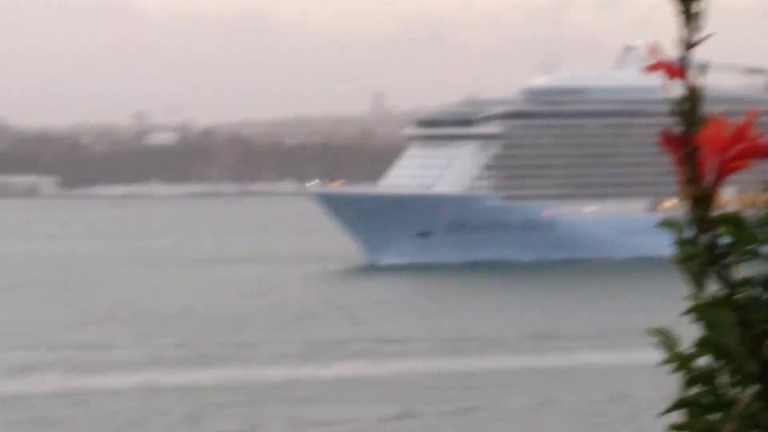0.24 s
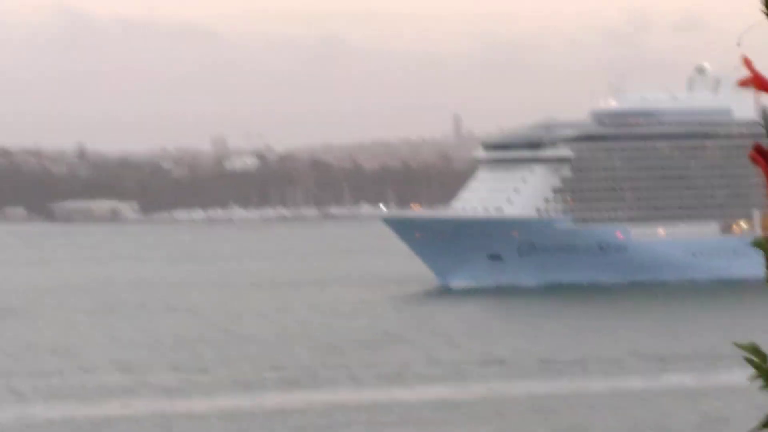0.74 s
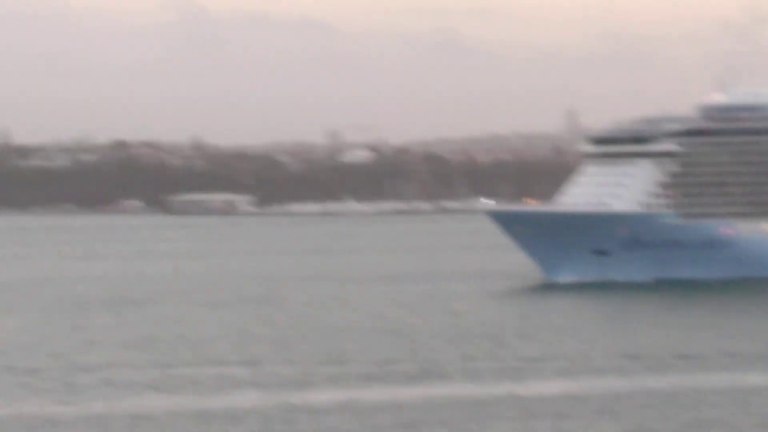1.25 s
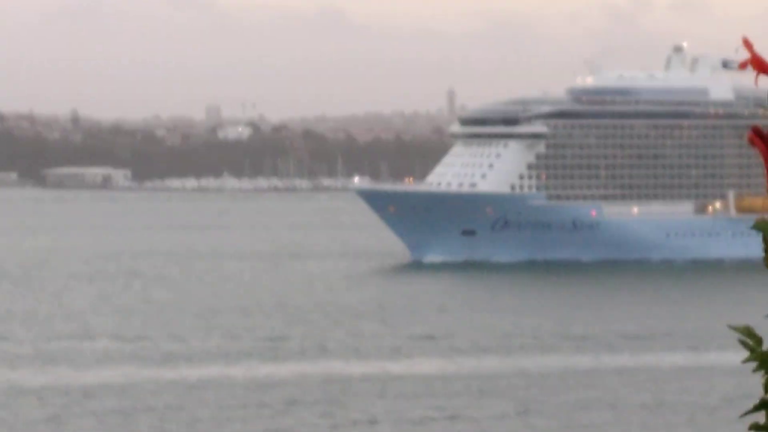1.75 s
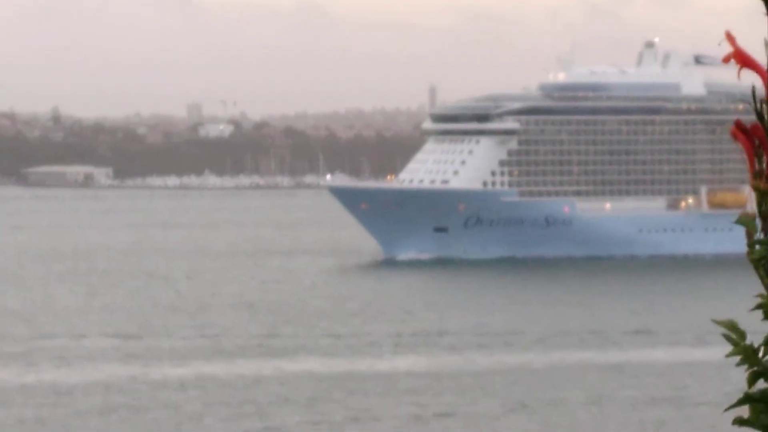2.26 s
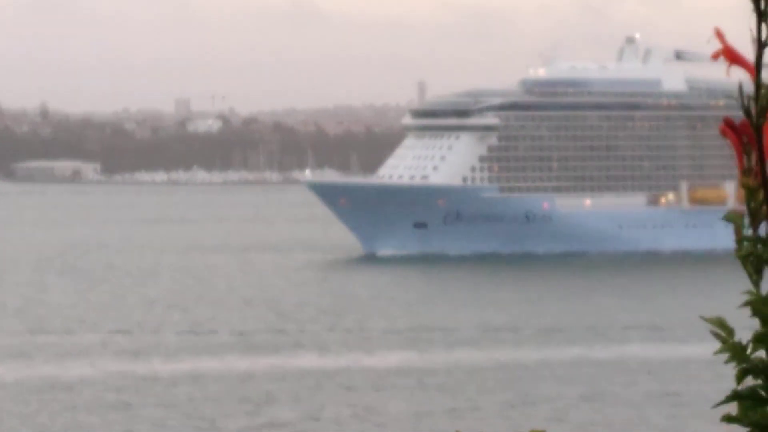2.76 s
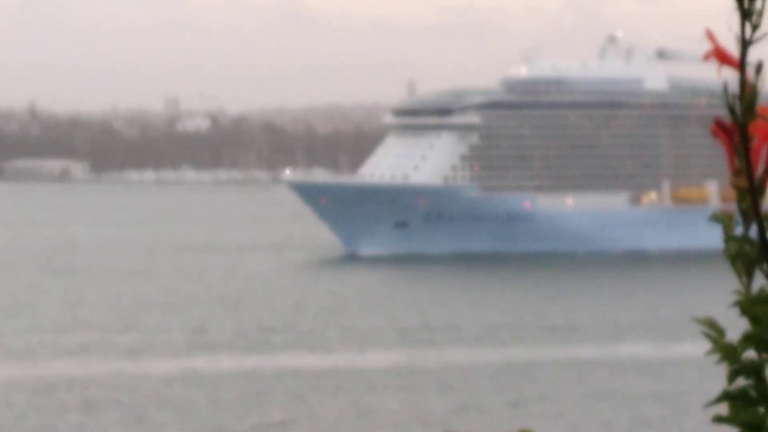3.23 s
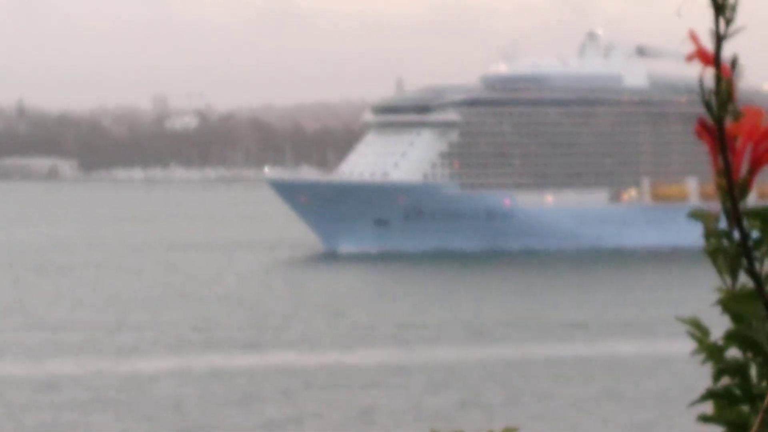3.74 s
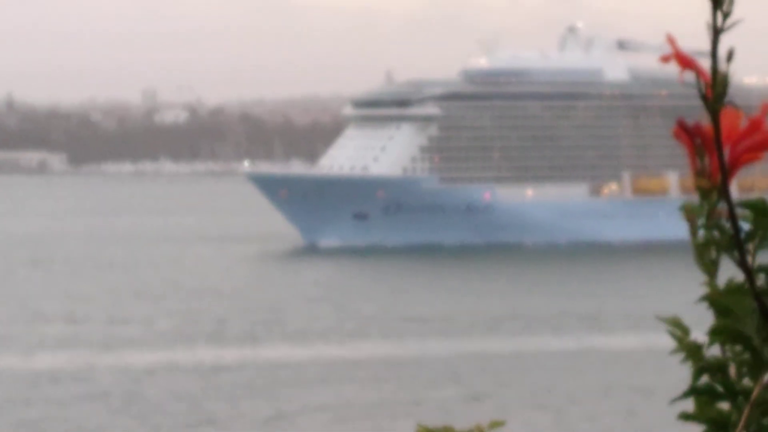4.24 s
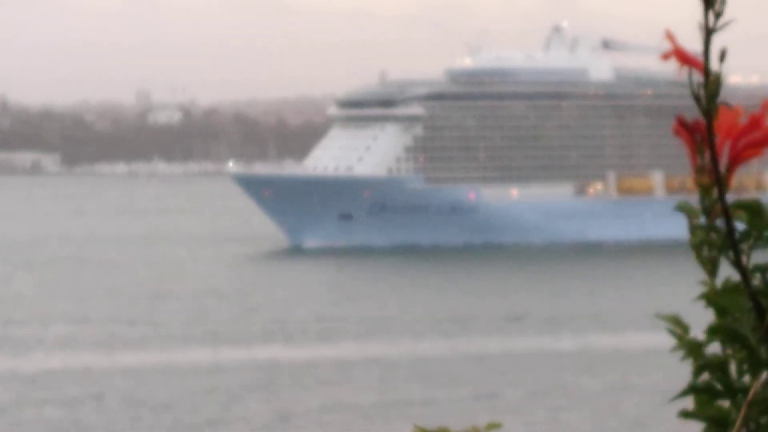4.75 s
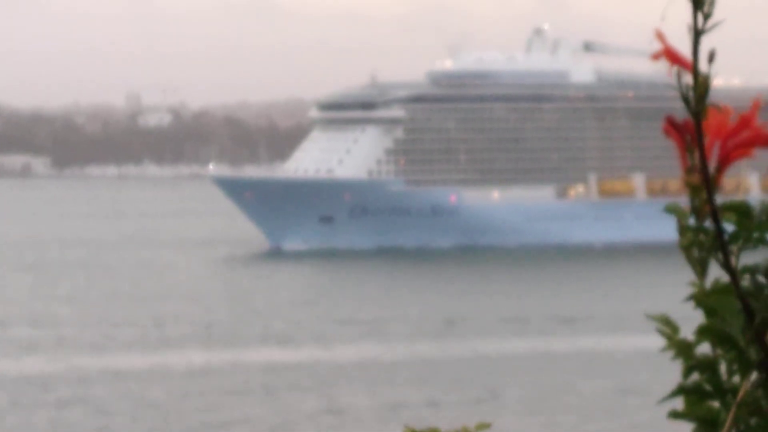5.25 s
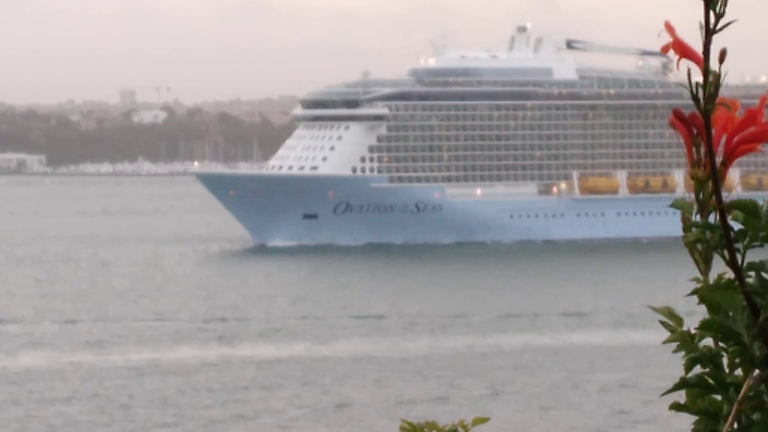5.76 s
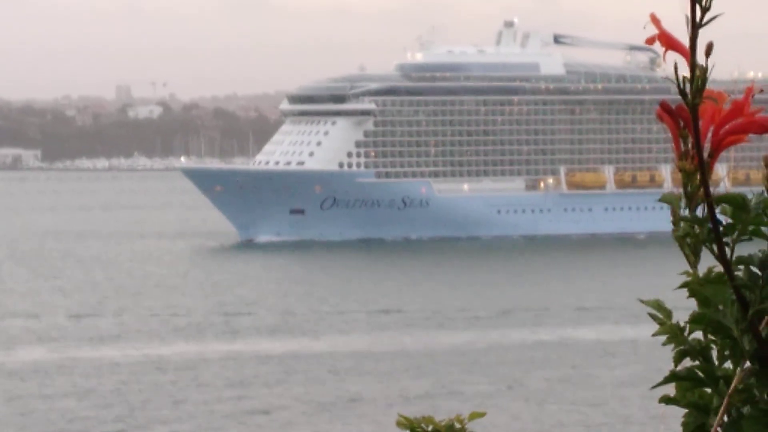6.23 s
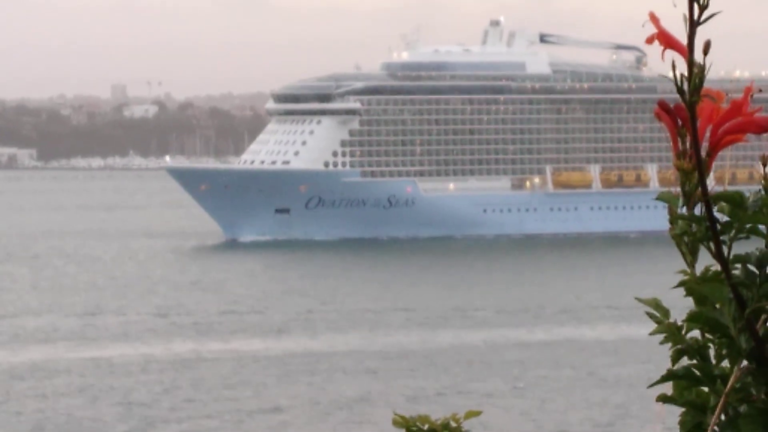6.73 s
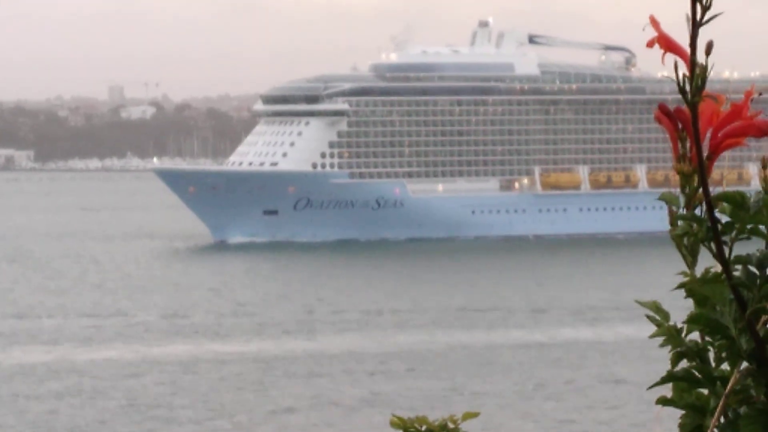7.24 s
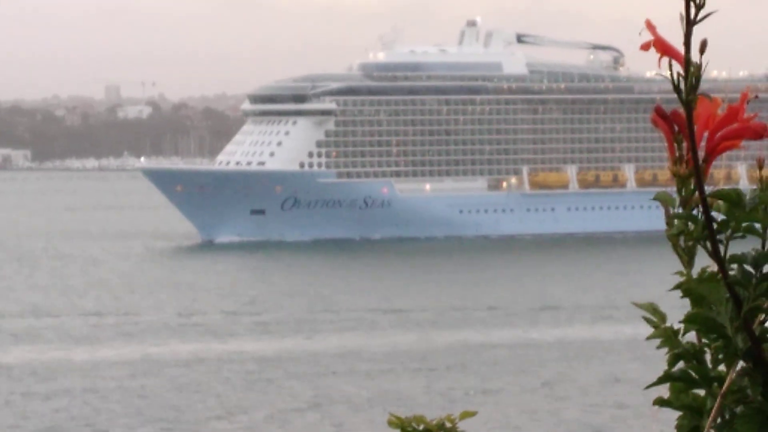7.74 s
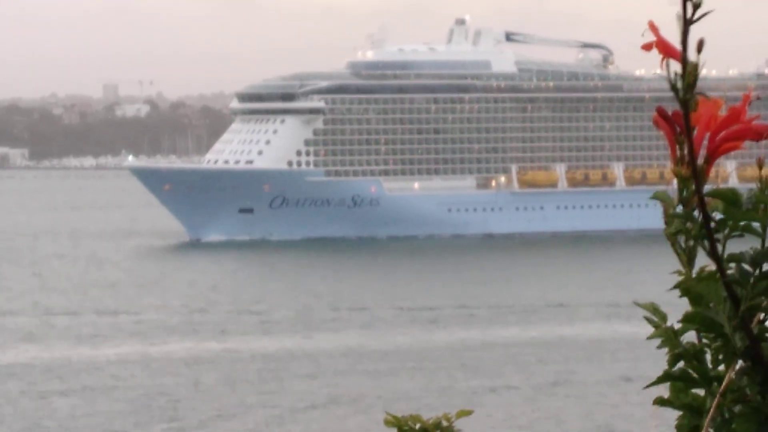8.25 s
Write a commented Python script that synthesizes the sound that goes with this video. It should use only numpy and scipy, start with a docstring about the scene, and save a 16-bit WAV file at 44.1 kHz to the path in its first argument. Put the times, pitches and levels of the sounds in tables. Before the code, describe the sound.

A large ship's low engine drone hums across open harbour water under buffeting wind, with faint high bird chirps and a small click near the end.

```python
"""Breezy harbour shore: wind thumps on two microphone ports (low noise), a far ship hums (sines) over its wash
(noise bands and brief tones). The treble is mostly muffled; now and then it opens slowly and shuts at once.
From 1.0 s thin chirps (gliding sines), 1.4 s a hoarse bird call (noise-modulated sines), then dry taps
(noise cracks); chirps thicken from 5.3 to 7.6 s; at 8.0 s a small hard thing clicks (decaying modes)."""
import sys
import numpy as np
from scipy import signal
from scipy.io import wavfile
from scipy.ndimage import uniform_filter1d

SR = 44100
rng = np.random.default_rng(int(sys.argv[2]) if len(sys.argv) > 2 else 0)


def field_ratio(decibels):
    """Amplitude ratio for a level in dB (20 dB per decade); scalars and array-likes work."""
    return 10 ** (np.asarray(decibels, dtype=float) / 20)


def file_out(sig):
    """Save sig as 16-bit WAV at sys.argv[1]."""
    # one column per channel
    cols = np.atleast_2d(sig).T
    # limit, then scale
    lim = np.clip(cols, -1, 1)
    pcm = np.round(lim * 32767).astype(np.int16)
    wavfile.write(sys.argv[1], SR, pcm)


N = 374409
TIME = np.arange(N) / SR

# Breeze between gusts: (time [s], left thump [dB], right thump [dB])
BREEZE = [(0, -29, -31.5), (0.7, -39.5, -40), (1.5, -43, -32), (2.4, -38, -33.5), (3.15, -40, -46),
          (3.8, -32, -31.5), (4.6, -39, -35), (5.3, -56, -41), (6.2, -49.5, -39.5), (6.8, -33.5, -37),
          (7.6, -40, -46), (8.49, -38, -33)]
# Gusts: (peak time [s], length [s], thump [dB], flutter before makeup gain [dB], left minus right [dB])
GUSTS = [(0.027, 0.071, -30.5, -65, -10), (1.181, 0.1, -24.5, -54, -9), (1.318, 0.14, -21, -39, -10.5),
         (1.828, 0.46, -27.5, -58.5, -21), (1.968, 0.1, -37.5, -52, 9), (2.185, 0.14, -31.5, -59.5, -10.5),
         (2.521, 0.23, -38, -58, 6.5), (2.735, 0.13, -26.5, -45, 5.5), (3.453, 0.11, -26.5, -39, -21.5),
         (3.583, .25, -28, -53, -7), (3.999, 0.17, -29, -48, -0.5), (4.334, 0.12, -37, -39.5, -13),
         (4.683, 0.4, -31.5, -48.5, -11), (6.38, 0.27, -49, -53, -11), (6.578, 0.16, -29.5, -61, 9),
         (6.849, 0.15, -33, -60, 8), (7.158, 0.14, -36, -54, -14.5), (7.363, 0.098, -30.5, -46, 5),
         (7.655, 0.31, -29.5, -58, 12), (7.945, 0.2, -40, -67, 8), (8.228, 0.24, -32, -58, 0.5),
         (8.42, .2, -33.5, -54, 10.5)]
# Bird whistles: (start [s], length [s], first pitch [Hz], last pitch [Hz], peak level before pan [dB])
CHIRPS = [(0.985, 0.019, 8450, 8450, -89), (1.958, .02, 8600, 8550, -85), (2.035, .032, 7900, 7560, -87.5),
          (2.91, .05, 8600, 8700, -93), (3.926, .025, 8300, 8640, -89), (3.97, 0.052, 8600, 8840, -91),
          (4.02, .12, 8700, 8650, -98), (5.275, 0.064, 7300, 7550, -80.5), (5.8, .024, 7100, 7420, -80),
          (5.845, .03, 8000, 7450, -83), (5.966, .04, 7800, 8100, -77), (6.0, .04, 8050, 7780, -73),
          (6.007, .03, 7450, 7400, -64), (6.04, 0.099, 7050, 7540, -67.5), (6.13, .04, 7200, 7800, -77),
          (6.29, .11, 7000, 7430, -67), (6.862, 0.073, 7100, 7620, -68.5), (6.886, 0.044, 3720, 3560, -73),
          (6.954, 0.039, 3360, 3584, -70), (7.099, 0.085, 7200, 7500, -66.5),
          (7.312, 0.063, 6660, 6800, -78.5), (7.546, .06, 6100, 5860, -88)]
# Hoarse bird call: (time [s], centre [Hz], level before makeup gain [dB])
RASP = [(1.37, 4150, -84), (1.4, 4400, -69), (1.45, 4490, -69.5), (1.542, 4400, -75.5), (1.55, 4590, -69.5),
        (1.63, 4420, -77), (1.635, 4530, -81)]
# Clicks of a small hard thing: (time [s], drive [dB])
CLICKS = [(8.0348, -30)]
# Its modes: (frequency [Hz], level re drive [dB], t60 [s], left minus right [dB])
CLICK_MODES = [(2960, -18, 0.041, -15), (3530, 1.5, 0.023, 5), (4300, 6, 0.018, 7), (4360, -3, 0.02, 3),
               (5240, -10, 0.03, 6), (5980, 2, .012, 5), (6340, 0.5, 0.035, 11), (6545, -25, .068, -2),
               (7040, -20, 0.069, 2), (7962, -20, .042, -8), (8963, -20, .051, -19), (9450, -8.5, .01, -19),
               (9800, -26, .08, -13)]
# Dry taps on the housing: (time [s], drive [dB], left minus right [dB], lowest frequency [Hz])
TAPS = [(1.613, -57, 12, 5000), (1.7385, -40.5, 1, 850), (2.746, -59, 14.5, 5500)]
# Clearest brief tones in the wash: (middle [s], frequency [Hz], peak rms level [dB], length [s])
MOANS = [(0.21, 860, -54, 0.16), (2.37, 390, -46, 0.15), (2.373, 681, -51.5, 0.17), (2.468, 337, -46, 0.15),
         (2.65, 521, -54, 0.13), (2.668, 314, -49, 0.37), (3.196, 710, -53, 0.21), (3.815, 670, -53, 0.25),
         (5.669, 697, -57.5, 0.31), (6.094, 745, -48.5, 0.11), (6.095, 327, -49, 0.18),
         (6.363, 945, -56, 0.25), (6.381, 864, -49.5, 0.14), (6.566, 445.4, -47, 0.15),
         (6.729, 364.7, -49, 0.18), (6.8, 325, -47, 0.15), (6.831, 573, -51.5, 0.16)]
# Treble openings: (from [s], to [s], share open [0-1])
OPENINGS = [(0.987, 1.007, 0.8), (1.217, 1.236, 0.67), (1.38, 1.633, 0.9), (1.725, 1.762, 0.9),
            (2.161, 2.207, 0.7), (2.243, 2.365, 0.84), (2.41, 2.46, 0.63), (2.467, 2.509, 0.73),
            (2.739, 2.766, 0.54), (3.04, 3.064, 0.9), (3.13, 3.16, 0.55), (3.406, 3.453, 0.85),
            (3.86, 3.9, 0.73), (4.245, 4.275, 0.66), (4.654, 4.671, .5), (5.3, 5.341, 0.8),
            (5.778, 5.822, 0.7), (5.838, 5.883, 0.77), (5.895, 6.521, 1.0), (6.561, 6.64, 0.7),
            (6.824, 6.856, 0.75), (6.875, 6.942, 0.77), (6.963, 7.004, 0.79), (7.13, 7.181, 0.9),
            (7.325, 7.409, 0.83), (7.561, 7.599, 0.7), (7.936, 8, 0.62), (8.04, 8.089, 0.87),
            (8.1, 8.237, 0.7), (8.241, 8.27, 0.75)]
# Swell of the far exhaust and water wash: (time [s], near 360 Hz [dB], near 820 Hz [dB], near 200 Hz [dB])
SWELL = [(0.0, -49, -51.5, -71), (0.09, -49, -52, -52), (0.8, -53, -54, -58.5), (1.16, -51.5, -57, -53.5),
         (2.22, -49.5, -53, -62), (2.41, -43.5, -50.5, -51), (2.84, -46, -54.5, -48.5),
         (3.19, -51.5, -52, -49), (3.59, -53, -55.5, -50.5), (3.83, -46, -49.5, -53.5),
         (4.09, -50, -54.5, -53.5), (5.37, -50.5, -52.5, -58.5), (6.48, -46.5, -50, -51.5),
         (6.53, -40.5, -56, -72), (6.74, -45, -52.5, -59), (6.81, -48.5, -54.5, -71.5),
         (6.88, -48.5, -52.5, -48.5), (7.59, -53, -57.5, -57.5), (8.16, -48.5, -49.5, -57.5),
         (8.49, -47, -58, -56)]
# Wash spectrum with treble open, before trim and swell: (frequency [Hz], level [dB])
WASH = [(20, -25.5), (60, -16.5), (90, -12.5), (130, -22), (220, -24.5), (290, -27.5), (400, -26),
        (560, -28.5), (750, -25.5), (1300, -36.5), (1800, -38.5), (2500, -46), (3500, -48), (5000, -57),
        (7500, -59.5), (10000, -68.5), (14000, -88.5)]
# Gain added while the treble is shut: (frequency [Hz], gain [dB])
MUFFLE = [(500, 0.5), (1000, -4), (2600, -13.5), (3200, -22.5), (5000, -19.5), (8000, -25), (11000, -12.5)]
# Left-right correlation of the wash noise: (frequency [Hz], likeness [0-1])
LIKENESS = [(60, 1), (140, 1), (320, 0.98), (750, 0.79), (1750, 0.18), (4000, 0.092)]
# Main engine firing pitch: (time [s], pitch [Hz])
ENGINE_PITCH = [(0, 85.44), (2.0, 84.3), (4.5, 83.74), (6.0, 82.38), (8.49, 82.36)]
# Its orders, wavering over the water: (time [s], first [dB], second [dB], third [dB])
ENGINE = [(0, -31, -56.5, -64.5), (0.5, -31.5, -52, -64), (0.85, -35, -57.5, -51),
          (1.7, -34.5, -52.5, -70.5), (2.05, -31, -50, -49.5), (2.4, -32, -53.5, -64),
          (3.1, -33.5, -50, -50.5), (3.52, -36, -46, -52), (3.92, -32, -48.5, -64),
          (4.3, -34.5, -47.5, -66), (4.7, -32.5, -48, -55), (5.35, -32.5, -51, -71.5),
          (5.96, -34, -52.5, -53.5), (6.3, -32, -44, -60), (6.8, -37.5, -53, -65), (7.52, -38, -46, -64),
          (8.3, -32.5, -45, -48), (8.49, -41, -52.5, -53)]
# Slow shaft throb and generator, before trim: (time [s], throb [dB], generator [dB])
HUMS = [(0, -40, -37), (1.39, -27, -44.5), (2.53, -31.5, -39.5), (3.05, -29.5, -45), (3.78, -41, -42),
        (4.1, -33.5, -39), (4.85, -34.5, -41.5), (5.3, -38.5, -40.5), (6.35, -33.5, -38.5),
        (6.62, -43.5, -45), (6.9, -29.5, -49), (7.3, -30.5, -57.5), (7.92, -28.5, -39.5),
        (8.49, -35.5, -43.5)]

FOURTH_RE_SECOND_DB = -11
THROB_HZ, GENERATOR_HZ = 28.9, 100.07
LEFT_LAG_SAMPLES = 4  # the ship reaches the left port later
ROUNDING_HISS_RMS_DB = -90


def rms_one(x):
    """Scale to rms 1."""
    return x / np.sqrt(np.mean(x ** 2) + 1e-20)


def in_time(rows):
    """Each column of a curve at every sample."""
    s, *columns = np.transpose(rows)
    return [np.interp(TIME, s, column) for column in columns]


def at_hz(points, hz):
    """Spectrum read on a log frequency axis."""
    point_hz, values = np.transpose(points)
    return np.interp(np.log(hz), np.log(point_hz), values)


def band(x, low_hz, high_hz, order=2):
    """Butterworth bandpass."""
    return signal.sosfilt(signal.butter(order, [low_hz, high_hz], "band", fs=SR, output="sos"), x)


def drift(rate_hz):
    """Slow random curve, rms about 1: noise through a double pole at 1/40 rate."""
    pole = np.exp(-80 * np.pi * rate_hz / SR)
    noise = rng.standard_normal(N // 40 + 2002)
    slow = signal.lfilter([1], [1, -2 * pole, pole * pole], noise)[2000:]  # settled part
    return np.interp(np.arange(N) / 40, np.arange(len(slow)), rms_one(slow))


def tone(hz):
    """Sine of rms 1 on a pitch curve."""
    return np.sqrt(2) * np.sin(2 * np.pi * np.cumsum(hz) / SR + rng.uniform(0, 2 * np.pi))


def panned(x, pan_db):
    """Left and right at a level difference."""
    return np.array([x * field_ratio(pan_db / 2), x * field_ratio(-pan_db / 2)])


def wind(body_hz=55, flutter_hz=150, lumpy_db=2.0):
    """Independent lumpy low noise per port: deep thump plus higher flutter; gusts swell over the breeze."""
    out, coarse_s = [], TIME[::100]
    s, length_s, thump_db, flutter_db, pan_db = np.transpose(GUSTS)
    swells = np.exp(-8 * ((coarse_s[:, None] - s) / length_s) ** 2)
    for breeze_db, side in zip(in_time(BREEZE), (1, -1)):
        shelter_db = np.minimum(side * pan_db, 0)  # the leeward port gets less
        thump_gust = np.interp(TIME, coarse_s, swells @ field_ratio(thump_db + shelter_db))
        flutter_gust = np.interp(TIME, coarse_s, swells @ field_ratio(flutter_db + shelter_db))
        thump_gain = field_ratio(breeze_db) + thump_gust
        flutter_gain = field_ratio(3) * (field_ratio(breeze_db - 23) + flutter_gust)
        white = rng.standard_normal((3, N))
        thump = rms_one(band(white[0], 25, body_hz))
        flutter = rms_one(band(white[1], 70, flutter_hz))
        heave = rms_one(band(white[2], 10, 24))  # slow pressure under the thump
        lumps = field_ratio(lumpy_db * drift(24))
        out.append(lumps * (thump_gain * (thump + heave) + flutter_gain * flutter))
    return np.array(out)


def note(rows, edge_s):
    """Span, pitch and gain of one call, faded at both ends."""
    s, hz, level_db = np.transpose(rows)
    span = slice(round(s[0] * SR), round(s[-1] * SR))
    t = TIME[span]
    fade = np.clip(np.minimum(t - s[0], s[-1] - t) / edge_s, 0, 1)
    return span, np.interp(t, s, hz), field_ratio(np.interp(t, s, level_db)) * fade


def whistles():
    """Thin sines, slightly quavering: each glides and grows to a late peak, then holds pitch and fades."""
    quaver, flutter = 1 + .007 * drift(70), field_ratio(2.5 * drift(60))
    out = np.zeros(N)
    for s, length_s, first_hz, last_hz, peak_db in CHIRPS:
        rows = [(s, first_hz, peak_db - 22.5),
                (s + .65 * length_s, last_hz, peak_db),
                (s + length_s, last_hz, peak_db - 6)]
        span, hz, gain = note(rows, edge_s=.004)
        out[span] += gain * flutter[span] * tone(hz * quaver[span])
    return panned(out, 4.5)


def hoarse_call():
    """Whistle roughened by noise modulation, with a partial at 1.1 times its pitch and an octave."""
    out = np.zeros((2, N))
    span, hz, gain = note(RASP, edge_s=.006)
    hz = hz * (1 + .012 * drift(40)[span])
    spread = np.linspace(.2, .9, len(hz))  # spreads upward as it goes on
    for port in out:
        centre = drift(260)[span] * tone(hz)
        upper = spread * drift(400)[span] * tone(1.1 * hz)
        octave = field_ratio(-15.5) * drift(500)[span] * tone(2 * hz)
        port[span] = gain * field_ratio(5.0) * (centre + upper + octave)
    return out


def clicks():
    """A short crack with the ringing modes of a hard thing, each decaying exponentially."""
    out, t = np.zeros((2, N)), np.arange(int(.12 * SR)) / SR
    for s, drive_db in CLICKS:
        ring = 0
        for hz, db, t60_s, pan_db in CLICK_MODES:
            mode = np.sin(2 * np.pi * hz * t + rng.uniform(0, 2 * np.pi))
            ring = ring + panned(field_ratio(db - 60 * t / t60_s) * mode, pan_db)
        crack = np.diff(rng.standard_normal(len(t) + 1)) * field_ratio(-9.5 - 60 * t / 0.019)
        hit = (ring + crack) * np.minimum(t / .001, 1) * field_ratio(drive_db - 7)
        out[:, round(s * SR):][:, :len(t)] += hit
    return out


def taps():
    """Bandpassed noise cracks led by an impulse; a deeper tap also rings briefly."""
    out, t = np.zeros((2, N)), np.arange(int(.12 * SR)) / SR
    for s, drive_db, pan_db, low_hz in TAPS:
        hit = rng.standard_normal(len(t)) + 2 * (t == 0)
        hit = band(hit * field_ratio(drive_db - 60 * t / .009), low_hz, min(2.2 * low_hz, 8500), order=1)
        if low_hz < 2000:
            hit = hit + field_ratio(drive_db - 2.5 - 60 * t / .02) * np.sin(2 * np.pi * 1.7 * low_hz * t)
        out[:, round(s * SR):][:, :len(t)] += panned(hit, pan_db)
    return out


def moans(per_s=12.0, below_db=-7):
    """Hann-shaped soft tones in the wash; fainter ones fall at random, loudest when it swells."""
    low_db, high_db, _ = in_time(SWELL)
    draws = rng.random((round(per_s * N / SR), 4))
    at = (draws[:, 0] * N).astype(int)
    faint_hz = 270 * 3.5 ** draws[:, 1]
    faint_db = np.where(faint_hz < 540, low_db[at], high_db[at]) + below_db - 8 * draws[:, 2]
    faint = list(zip(at / SR, faint_hz, faint_db, .08 + .16 * draws[:, 3]))
    out = np.zeros(N + 2 * SR)  # 1 s margin at each end
    for s, hz, level_db, length_s in MOANS + faint:
        t = np.arange(int(length_s * SR)) / SR
        start = SR + round((s - length_s / 2) * SR)
        gain = np.sqrt(2) * field_ratio(level_db) * np.hanning(len(t))
        out[start:start + len(t)] += gain * np.sin(2 * np.pi * hz * t)
    return out[SR:SR + N]


def openness(rise_s=0.077, flicker=0.11):
    """Treble share open: climbs steadily in dB, holds, drops at once; brief flickers fill the time between."""
    share = flicker * np.clip(drift(35) + .5 * drift(1.5), 0, 2.1) ** 2
    for start_s, stop_s, top in OPENINGS:
        span = slice(round((start_s - 0.24 * rise_s) * SR), round(stop_s * SR))
        climb = np.minimum(.28 + (TIME[span] - start_s) / rise_s, top)
        share[span] = np.maximum(share[span], climb)
    return uniform_filter1d(np.clip(share, 0, 1), size=130)


def wash(pitch_hz, share, patchy_db=2.0, puff=0.16):
    """Noise bands that swell, flicker, puff with each firing and lose treble while muffled."""
    low_db, high_db, deep_db = in_time(SWELL)
    puffs = 1 + puff * tone(pitch_hz)
    out, edges_hz = 0, 40 * 2 ** np.arange(0, 8.7, .45)
    # dull noise in, so loud low bands do not spill into the quiet treble
    dulling = signal.butter(2, 700, fs=SR, output="sos")
    dull = signal.sosfilt(dulling, rng.standard_normal((2, 2, N)))
    for k, (bottom_hz, top_hz) in enumerate(zip(edges_hz, edges_hz[1:])):
        mid, side = band(dull[k % 2], bottom_hz, top_hz)
        hz = np.sqrt(bottom_hz * top_hz)
        undo = np.sqrt(1 + (hz / 700) ** 4)  # restores the dulling loss
        alike = at_hz(LIKENESS, hz)
        # each swell carries bands near its centre; far bands stay level
        octaves = np.log2(hz / np.array([360, 820, 200]))
        low, high, deep = np.exp(-octaves ** 2 / np.array([.4, .6, .15]))
        swell_db = low * (low_db + 51.0) + high * (high_db + 51.0) + deep * (deep_db + 55.5)
        muffle_db = (1 - share) * at_hz(MUFFLE, hz)
        patch_db = patchy_db * (1 if hz < 1100 else .4) * (drift(5.4) + 0.54 * drift(11))
        gain = undo * field_ratio(at_hz(WASH, hz) - 9.0 + swell_db + muffle_db + patch_db)
        if 400 < hz < 2500:
            gain = gain * puffs
        out = out + gain * (np.sqrt(1 + alike) * mid + np.sqrt(1 - alike) * side * [[1], [-1]])
    return out


def engines():
    """Sines at four firing orders plus two unrelated hums, each fluttering a little in the air."""
    pitch_hz, = in_time(ENGINE_PITCH)
    pitch_hz = pitch_hz * (1 + .0015 * drift(1.604))
    first_db, second_db, third_db = in_time(ENGINE)
    out = 0
    for k, level_db in enumerate([first_db, second_db, third_db, second_db + FOURTH_RE_SECOND_DB]):
        out = out + field_ratio(level_db + (.5 + 0.78 * k) * drift(2.3)) * tone((k + 1) * pitch_hz)
    throb_db, generator_db = in_time(HUMS)
    throb = tone(THROB_HZ * (1 + .02 * drift(1.2)))
    out = out + field_ratio(throb_db - 2.5 + 2.5 * drift(4)) * throb
    out = out + field_ratio(generator_db - 2.5 + 0.86 * drift(1.6)) * tone(np.full(N, GENERATOR_HZ))
    return panned(out, 0.46), pitch_hz


def scene():
    """Wind, birds, clicks and taps around the ship, whose left channel lags."""
    hum, pitch_hz = engines()
    ship = hum + wash(pitch_hz, openness()) + moans()
    ship[0] = np.pad(ship[0], (LEFT_LAG_SAMPLES, 0), "edge")[:N]
    return wind() + whistles() + hoarse_call() + clicks() + taps() + ship


def low_pass(x):
    """Removes everything above the highest recorded frequency."""
    return signal.sosfilt(signal.butter(12, 15600, fs=SR, output="sos"), x)


def record(dry):
    """Soft start and end; a lowpass dulls everything above about 10 kHz; a faint flat rounding hiss lies over all."""
    fade = np.clip(np.minimum(TIME, TIME[::-1]) / .008, 0, 1)
    lowpass = signal.cheby2(4, 13, 10500, fs=SR, output="sos")
    dulled = signal.sosfilt(lowpass, dry * fade)
    rounding_hiss = field_ratio(ROUNDING_HISS_RMS_DB) * rng.standard_normal(dry.shape)
    return low_pass(dulled + rounding_hiss)


dry = scene()
out = record(dry)
file_out(out)
```